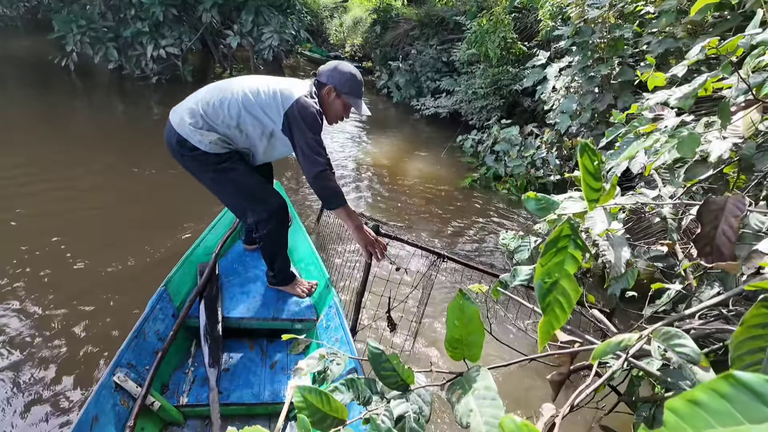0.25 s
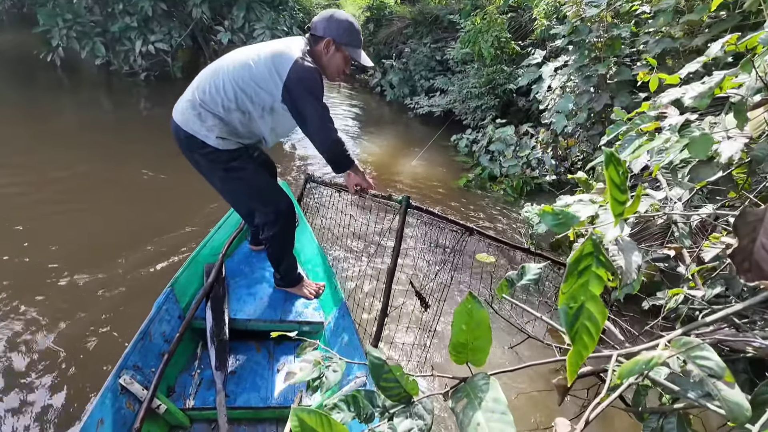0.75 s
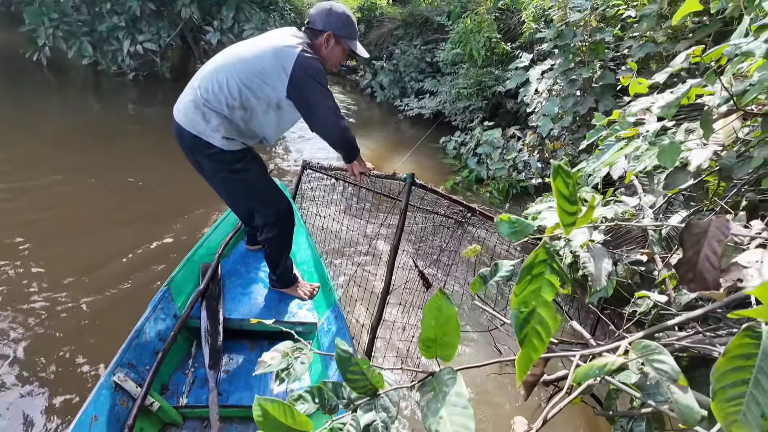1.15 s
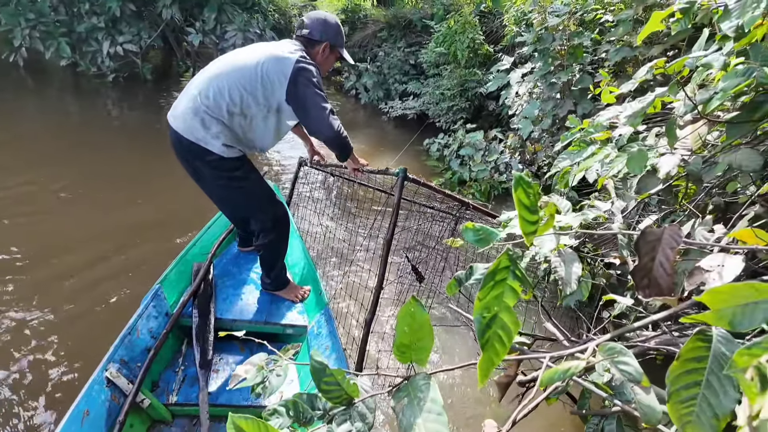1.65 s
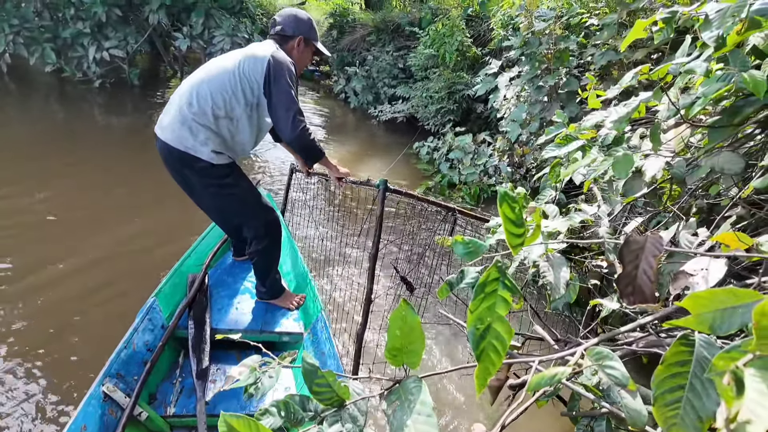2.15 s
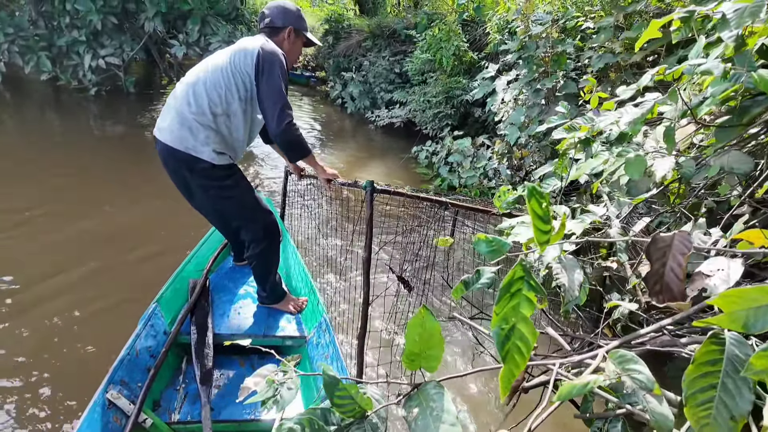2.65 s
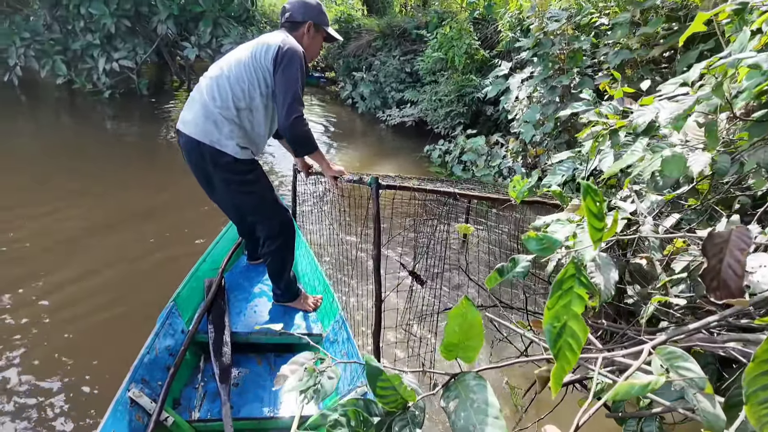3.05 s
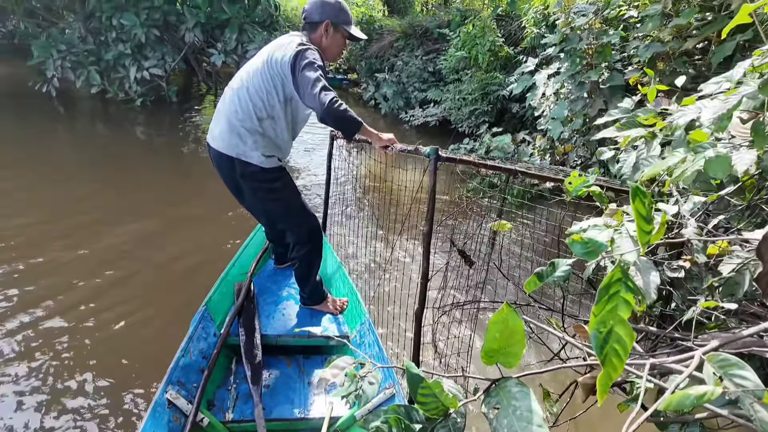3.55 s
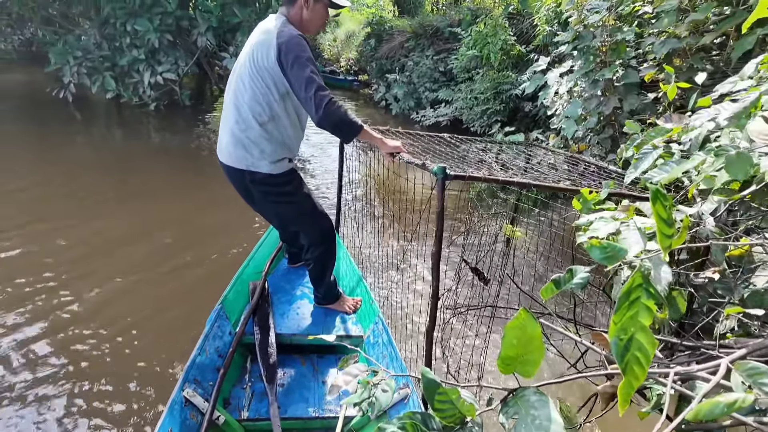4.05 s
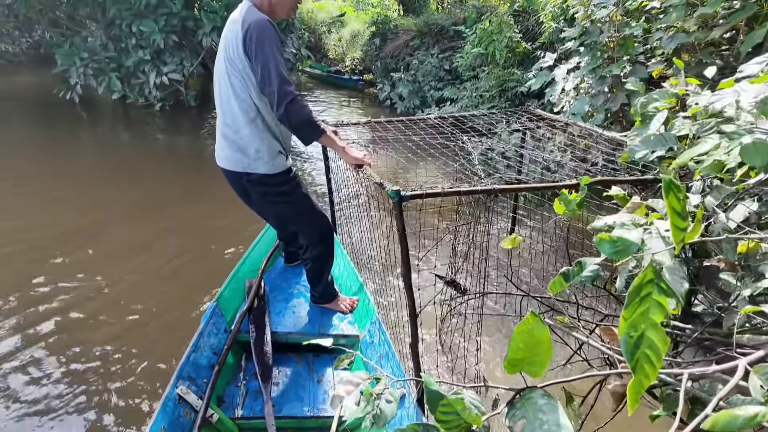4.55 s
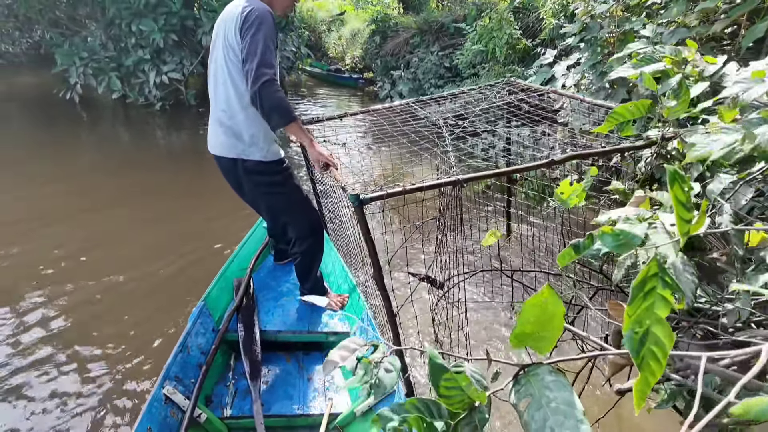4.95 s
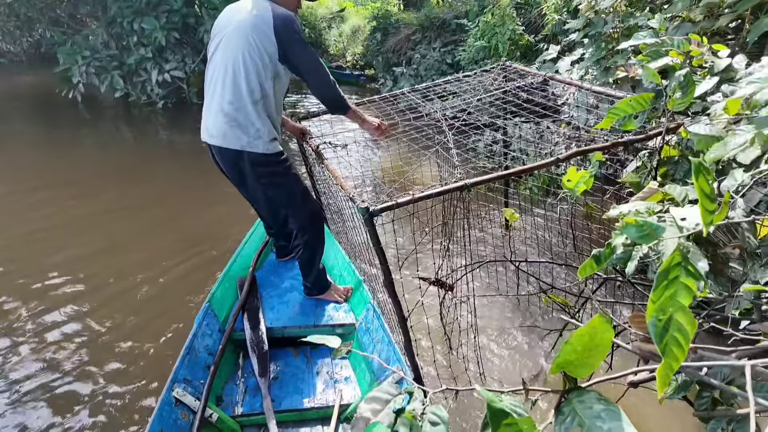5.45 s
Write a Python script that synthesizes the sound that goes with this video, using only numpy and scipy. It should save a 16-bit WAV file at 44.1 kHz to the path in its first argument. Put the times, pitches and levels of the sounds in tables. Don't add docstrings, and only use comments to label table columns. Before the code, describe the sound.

A metal-framed mesh fish trap scrapes and knocks hollowly against a wooden boat, wires ticking and wet mesh rustling through leaves while cicadas buzz.

```python
import sys
import numpy as np
from scipy import signal
from scipy.fft import rfft, irfft
from scipy.io import wavfile
from scipy.ndimage import uniform_filter1d, minimum_filter1d

SR = 44100
rng = np.random.default_rng(int(sys.argv[2]) if len(sys.argv) > 2 else 0)


def inscribe(sig):
    pcm = np.round(np.clip(np.atleast_2d(sig).T, -1, 1) * 32767)
    wavfile.write(sys.argv[1], SR, pcm.astype(np.int16))


def boost_factor(decibels):
    exponent = np.asarray(decibels, float) / 20
    return 10 ** exponent


N = 251370


def evened(x):
    return x / np.sqrt(np.mean(x ** 2) + 1e-20)


def peaked(x):
    return x / abs(x).max()


def read(points, hz):
    f, value = np.transpose(points)
    return np.interp(np.log(hz + 1), np.log(f + 1), value)


def curve(table, column):
    rows = np.array(table)
    return boost_factor(np.interp(np.arange(N) / SR, rows[:, 0], rows[:, column]))


def swells(s, db, rise_s, fall_s):
    hop = 64
    t = np.arange(0, N + hop, hop)[:, None] / SR - np.array(s)
    below_db = 20 * np.where(t < 0, -t / rise_s, t / fall_s)
    power = boost_factor(np.array(db) - below_db) ** 2
    return np.interp(np.arange(N), np.arange(len(t)) * hop, np.sqrt(power.sum(1)))


def add(mix, s, sound):
    part = mix[..., round(s * SR):][..., :sound.shape[-1]]
    part += sound[..., :part.shape[-1]]


def ring(modes, seconds):
    t = np.arange(round(seconds * SR)) / SR
    return sum(boost_factor(db - 60 * t / t60) * np.sin(2 * np.pi * hz * t) for hz, db, t60 in modes)


def clicks(per_s, spread_db, channels):
    out = np.zeros((channels, N))
    count = round(per_s * N / SR)
    place, sign, size = rng.random((channels, count, 3)).T
    size_db = spread_db * np.minimum(-np.log(size + 1e-9), 4)
    heights = np.sign(sign - .5) * boost_factor(size_db)
    np.put_along_axis(out, (place.T * N).astype(int), heights.T, axis=1)
    return out


def smooth_noise(shape, bins, frames):
    across = uniform_filter1d(rng.standard_normal(shape), bins, axis=0)
    return evened(uniform_filter1d(across, frames, axis=1))


# (frequency [Hz], likeness [0-1])
LIKENESS = [(60, 1), (180, 0.92), (550, 0), (1650, 0.49), (4970, -0.0), (15000, 0.01)]


def coloured(x, spectrum, patchy_db):
    hz, t, z = signal.stft(x, SR, nperseg=512)
    patches = smooth_noise(z.shape[1:], bins=6, frames=8)
    same = np.clip(read(LIKENESS, hz), 0, 1)[:, None] ** 2
    mid = z[0] * np.sqrt(1 + same)
    side = z[1] * np.sqrt(1 - same)
    z = np.array([mid + side, mid - side]) * boost_factor(read(spectrum, hz)[:, None] + patchy_db * patches)
    return evened(signal.istft(z, SR, nperseg=512)[1][:, :N])


# (time [s], depth [dB])
DUCKS = [
    (.17, 2),
    (.48, 6),
    (1.01, 9.5),
    (3.385, 6),
    (3.715, 15),
    (4.175, 16.5),
]
RECOVER_DB_PER_S, DUCK_S = 7, 0.022


def ducking():
    ducks = np.array(DUCKS)
    since_s = np.arange(N) / SR - ducks[:, :1]
    depth_db = np.where(since_s > 0, ducks[:, 1:] - RECOVER_DB_PER_S * since_s, 0).max(0)
    return boost_factor(-uniform_filter1d(np.maximum(depth_db, 0), size=round(DUCK_S * SR)))


def slips_into(modes, per_s, spread_db, detune, uneven_db, spot_db, wide, count):
    spot_s, damped = .08, 0.85
    out = np.zeros((2, N))
    for tuning, balance in rng.uniform(-1, 1, (count, 2, len(modes))):
        visits = np.interp(np.arange(N) / SR / spot_s, np.arange(200), rng.uniform(-1, 1, 200))
        slips = clicks(per_s / count, spread_db, channels=2) * boost_factor(spot_db * visits)
        spread = slips[0] + wide * slips[1] * [[1], [-1]]
        tuned = [(hz * (1 + detune * a), db + uneven_db * b, t60 * damped)
                 for (hz, db, t60), a, b in zip(modes, tuning, balance)]
        out += signal.oaconvolve(spread, ring(tuned, 0.13)[None], axes=1)[:, :N]
    return evened(out)


# (time [s], pressure [dB], scrape over boom [dB])
DRAG = [(0.0, -28, -11), (0.11, -26.5, -7.5), (0.3, -26.5, 0), (0.62, -30.5, 5.5), (0.7, -29.5, 2),
        (0.83, -24.5, 1.5), (1.16, -32, -5.5), (1.46, -29, 1), (1.73, -37, -13), (1.9, -60.5, -2),
        (2.35, -43.5, -9.5), (2.81, -50, 18.5), (3.1, -48, 2.5), (3.33, -23, 0.5), (3.7, -23, 0.3),
        (3.76, -24, -12.5), (3.86, -46.5, -1), (5.7, -53.5, -0.5)]
# (time [s], boom [dB], scrape [dB], length [s])
RUBS = [
    (2.16, -47, -36, 0.24),
    (4.098, -43, -46, 0.11),
    (4.845, -61, -39.5, 0.22),
    (5.097, -50, -39, 0.16),
    (5.26, -35.5, -36.5, 0.43),
    (5.434, -43, -45, 0.094),
]
# (frequency [Hz], level [dB], t60 [s])
PANELS = [(130, -48, 0.047), (148, 4.5, 0.28), (170, -2.5, 0.074), (191.4, -6.5, 0.15), (236.7, -2, 0.15),
          (285, -17.5, 0.068), (398, -20, 0.19)]
# (frequency [Hz], level [dB], t60 [s])
GUNWALE = [(377, -1, .06), (505, 0, .06), (570, 2, .06), (700, 4, .05), (884, 6, .06), (1068, 7, .05),
           (1310, 6, .04), (1500, 5, .035), (1860, 4, .03), (2190, 3, .025), (2900, -1, .025)]
SHUDDER_BOOM_DB, SHUDDER_SCRAPE_DB, SHUDDER_S = -16.5, -18, 0.12
DRAG_TOP_DB = -19


def drag():
    boom = slips_into(PANELS, 400, 3.6, detune=0.049, uneven_db=1.0, spot_db=11, wide=0.05, count=3)
    scrape = slips_into(GUNWALE, 3200, 3.2, detune=0.07, uneven_db=6, spot_db=6, wide=0.28, count=8)
    s, crack_db, over_db = np.transpose(KNOCKS)[:3]
    rub_s, boom_db, scrape_db, length_s = np.transpose(RUBS)
    press = curve(DRAG, column=1)
    low = press + swells(s, crack_db + over_db + SHUDDER_BOOM_DB, 0.017, SHUDDER_S)
    low += swells(rub_s, boom_db, length_s, length_s)
    high = press * curve(DRAG, column=2)
    high += swells(s, crack_db + SHUDDER_SCRAPE_DB, 0.013, 0.66 * SHUDDER_S)
    high += swells(rub_s, scrape_db, length_s, length_s)
    return boom * np.minimum(low, boost_factor(DRAG_TOP_DB)) + scrape * high * boost_factor(-4)


# (time [s], level [dB], length [s])
HEAVES = [(0.0, -14, 0.12), (.27, -20, 0.11), (.76, -24, .15), (1.007, -45, .1), (1.246, -17, .1),
          (1.84, -20.5, 0.13), (2.3, -29, 0.19), (2.55, -36, 0.1), (2.96, -17.5, 0.3), (3.26, -16, .1),
          (3.7, -36, 0.11), (4.105, -34, 0.2), (4.52, -35, .2), (4.9, -34, 0.5), (5.455, -31, 0.75)]
STILL_DB = -43


def heaving_water():
    band = signal.butter(2, [52, 80], "bandpass", fs=SR, output="sos")
    rumble = evened(signal.sosfilt(band, rng.standard_normal(N)))
    s, db, length_s = np.transpose(HEAVES)
    level = swells(s, db, length_s, length_s) + boost_factor(STILL_DB) * ducking()
    return rumble * level * boost_factor(-10.5)


# (frequency [Hz], width [Hz], level [dB])
SONG = [(5740, 200, -20.5), (7533, 400, -7), (7828, 890, 2), (14960, 640, -25), (15030, 760, -10.5)]
# (frequency [Hz], density [dB per Hz])
AIR = [(40, -12), (70, 7), (150, 10.5), (300, -39), (1000, -32), (2500, -33), (4500, -14), (6500, -10),
       (9500, -17.5), (12500, -14), (14000, -17), (16000, -41)]
SINGERS_DB = -29


def cicadas():
    pulses = evened(clicks(1400, 2.5, channels=2)) + .5 * rng.standard_normal((2, N))
    body = ring([(hz, db + 20 * np.log10(width / 500) / 2, 2.2 / width) for hz, width, db in SONG], .02)
    soft = body * np.minimum(np.arange(len(body)) / 47.0, 1)
    song = evened(signal.oaconvolve(pulses, soft[None], axes=1)[:, :N])
    wash = coloured(rng.standard_normal((2, N)), AIR, patchy_db=2.5)
    both = song * boost_factor(1.5) + wash * boost_factor(-6.0)
    return both * boost_factor(SINGERS_DB) * ducking() * boost_factor([[-.6], [.6]])


# (time [s], level [dB], rise [s], fall [s])
PULLS = [(.27, -32.5, 0.065, .06), (.4, -27, 0.14, 0.12), (.59, -28, 0.19, 0.19), (.78, -35, 0.057, 0.1),
         (.97, -37.5, 0.056, 0.07), (1.25, -35, .06, .07), (1.35, -37.5, 0.1, 0.11),
         (2.615, -30, 0.008, 0.14), (2.76, -31.5, 0.19, 0.072), (2.84, -26.5, 0.05, 0.1),
         (3.25, -26, 0.23, 0.27), (3.38, -29, 0.034, 0.022), (3.6, -33.5, 0.32, 0.23),
         (3.71, -31.5, 0.044, 0.025), (4.19, -44.5, 0.084, 0.41), (4.35, -42.5, 0.03, 0.25),
         (4.58, -34.5, 0.037, 0.75), (4.79, -32, 0.063, 0.18), (4.971, -30.5, 0.15, 0.43),
         (5.088, -17, 0.003, 0.03), (5.1, -27, 0.02, 0.13), (5.195, -23, .005, 0.006),
         (5.2, -35.5, 0.081, 0.93), (5.4, -34, 0.13, 0.17)]
# (time [s], level [dB])
RUNOFF = [
    (0.0, -40.5),
    (1.0, -36),
    (1.68, -47.5),
    (2.59, -43.5),
    (3.7, -35.5),
    (4.5, -40.5),
    (5.7, -33.5),
]
# (frequency [Hz], density [dB per Hz])
RUSTLE = [(300, -16.5), (600, -10), (1000, -9.5), (1600, -4), (3000, -2.5), (6300, -8.5), (7500, -11.5),
          (9000, -8.5), (12500, -11), (16000, -10.5)]


def rustle():
    grains = evened(clicks(4500, 2.24, channels=2)) + .5 * rng.standard_normal((2, N))
    crackle = coloured(grains, RUSTLE, patchy_db=1.2)
    level = np.hypot(swells(*np.transpose(PULLS)), curve(RUNOFF, column=1) * ducking())
    return crackle * level * boost_factor(4.5) * boost_factor([[-.6], [.6]])


# (time [s], crack [dB], boom over crack [dB], small panels over large [dB], boom [Hz])
KNOCKS = [(.159, -8, 6, 3.5, 148), (0.222, -21.5, 10, -4, 143.5), (0.423, -23, 13.5, 10.5, 129),
          (0.449, -16.5, 5, -18, 154), (0.462, -14, 2, -13, 156), (.472, -7.5, 1.5, 21, 131),
          (0.481, -18, 10.5, -26, 148), (0.498, -23, 14.5, 8, 148), (0.56, -14.5, 7, 10.5, 163.4),
          (.581, -17, 12, 3, 143), (0.942, -23.5, 12.5, -12, 130), (0.994, -8.5, 9, 2.5, 137),
          (1.218, -18, 2, -11, 124), (1.375, -26.5, 9, 10, 127), (1.437, -27, 11, -10, 147),
          (3.202, -38, 20, -25, 127), (3.375, -3, -1, 7.5, 156.5), (3.433, -33, 2, 4, 160),
          (3.484, -17, 13.5, 27, 166), (3.53, -21, 4.5, -8, 170), (3.588, -12.5, 3, 9, 122),
          (3.663, -20, 3, 0, 128), (3.705, -8, 4.5, 0, 148), (4.206, -34, 3, 8, 160)]
# (frequency [Hz], level [dB], t60 [s])
PLANKS = [(375, -5.5, 0.042), (541, 5.5, 0.11), (670.7, -2, 0.16), (931, 3.5, 0.13), (1070, 4, 0.05),
          (1266, 9, 0.047), (1539, 11, 0.041), (1800, -0.5, 0.027), (2200, 5, 0.028), (2700, -3.5, 0.041),
          (3500, 0.5, 0.029)]
CRACK_TOP_HZ, CRACK_FLOOR_HZ, DB_PER_OCTAVE = 1600., 650., 21


def knocks():
    size = 8192
    out = np.zeros(N)
    hz = np.fft.rfftfreq(size, 1 / SR)
    rest = boost_factor(-8.0 / (1 + np.exp((.058 - np.arange(size) / SR) / 0.0043)))
    travel = np.exp(-4j * np.pi * .16 * (np.sqrt(hz) - hz / (2 * np.sqrt(6000.))))
    front = hz ** 2 / (117.0 ** 2 + hz ** 2) / (hz + 100) ** 0.61
    for s, db, boom_db, small_db, boom_hz in KNOCKS:
        tuning, balance = rng.uniform(-1, 1, (2, len(PLANKS)))
        crack_hz = max(CRACK_TOP_HZ * 2 ** (db / DB_PER_OCTAVE), CRACK_FLOOR_HZ)
        planks = [(f * (1 + .05 * a), d + 3.0 * b - 3.0 * abs(np.log2(f / crack_hz)), t60)
                  for (f, d, t60), a, b in zip(PLANKS, tuning, balance)]
        panels = [(f, d + small_db, t60) if f > 200 else (f * boom_hz / 145.1, d, t60)
                  for f, d, t60 in PANELS]
        path = travel / (1 + (hz / (1.5 * crack_hz)) ** 6)
        late_s = .014 * rng.random((6, 1))
        sign = rng.choice([-1., 1.], (6, 1))
        echoes = .75 * sign * boost_factor(-600 * late_s) * np.exp(-2j * np.pi * hz * late_s)
        ribs = 1 + echoes.sum(0)
        crack = peaked(irfft(rfft(ring(planks, 0.13), size) * path))
        crack = crack + boost_factor(4.5) * peaked(irfft(front * path * ribs))
        boom = peaked(irfft(rfft(ring(panels, 0.26), size) * path)) * rest
        add(out, s, boost_factor(db) * (peaked(crack) + boost_factor(boom_db) * boom)[:7600])
    return out


# (time [s], level [dB], pitch [Hz])
BENCHES = [(.164, -9.5, 237.5), (.166, -17, 424), (0.182, -6.5, 141), (3.716, -5.5, 148), (.173, -10, 514),
           (0.4722, -2.5, 1440), (0.999, -11, 388), (1.002, -18, 295), (3.378, -9, 853), (3.384, -13, 650),
           (3.707, -3, 2250), (3.706, 0, 1042), (3.711, -5.5, 580), (3.377, -11, 1600), (3.483, -20, 1500),
           (3.486, -18, 877), (1.437, -18, 450), (1.438, -24, 900), (1.221, -21, 1020), (.3688, -12, 1600),
           (2.752, -26, 2500), (2.8258, -13, 1650), (2.8433, -12, 1300), (2.846, -16, 800),
           (2.6098, -23, 4430), (2.6105, -27, 1800), (2.8262, -20, 3100), (2.331, -27, 1030),
           (2.194, -31, 2550), (.3518, -17, 1760), (.4511, -15, 1310), (.5578, -19, 1290),
           (.996, -15, 1300), (1.2158, -24, 1600), (3.4842, -21, 2150), (3.2033, -23, 3170),
           (2.6931, -27, 1990)]
BENCH_CYCLES, BENCH_RISE_S, BENCH_LONGEST_S = 37, 0.0013, .13


def benches():
    out, t = np.zeros(N), np.arange(6000) / SR
    for s, db, hz in BENCHES:
        t60 = min(BENCH_CYCLES / hz, BENCH_LONGEST_S)
        pair = ring([(hz, db, t60), (hz * 1.2, db - 9.5, t60)], len(t) / SR)
        add(out, s, pair * np.minimum(t / BENCH_RISE_S, 1))
    return out


# (time [s], level [dB], pitch [Hz], spray over it [dB])
WIRES = [(0.257, -11.5, 1500, -27), (0.353, -7, 1780, -13), (0.369, -12, 1690, -21),
         (0.387, -13, 1540, -33), (0.408, -12.5, 1430, -17), (0.523, -19, 2980, -11),
         (0.546, -28, 630, -16), (0.588, -18, 746, -18), (0.719, -31, 1070, -15), (0.766, -18.5, 630, -21),
         (0.848, -23, 1000, -25), (0.955, -17, 1800, -19), (1.054, -30, 1040, -13),
         (1.104, -22.5, 970, -13), (1.25, -23, 1090, -22), (1.34, -25, 2240, -21), (1.464, -22, 1600, -5),
         (2.695, -13.5, 970, -15), (2.707, -14, 1230, -5), (2.73, -16, 950, -19), (2.768, -16.5, 935, -11),
         (2.821, -13, 2900, -13), (2.844, -11, 1000, -20), (2.881, -23, 805, -6), (3.339, -11, 645, -18)]
# (time [s], level [dB], pitch [Hz])
PINGS = [(0.2625, -10.5, 3700), (0.3878, -10, 2600), (0.4204, -12.5, 2550), (0.5804, -12.5, 4530),
         (1.2509, -15, 2560), (1.3405, -19, 2170), (2.331, -20, 1600), (2.3304, -17, 3500),
         (4.566, -39, 3690), (5.0861, -13, 2770), (5.1921, -16, 3180)]
# (time [s], level [dB], pitch [Hz], leaf hiss over it [dB])
TWIGS = [(0.418, -19, 953, 16), (1.208, -17, 1700, 4), (1.888, -32.5, 2700, -3), (2.118, -34, 1130, -2),
         (2.194, -26, 1600, -3), (2.331, -20.5, 1800, 8), (2.4, -28, 2050, -5), (2.569, -28, 1310, -4),
         (2.61, -17, 4270, 6), (3.109, -18, 2600, 14), (3.252, -13.5, 2520, -5), (3.29, -16.5, 1550, 2),
         (4.336, -38, 2200, 20), (4.384, -33, 3040, -18), (4.799, -27.5, 1400, -14),
         (4.956, -20, 3780, -13), (4.979, -19, 3360, -12), (5.086, -12, 3980, 2), (5.344, -24, 2310, 2),
         (5.419, -19.5, 2350, 7), (5.525, -22, 1310, -9)]
WIRE_PAN_DB, TWIG_PAN_DB, PING_PAN_DB, PING_SPRAY_DB = -0.5, -1.5, 1, -26
WIRE_RATTLE_S, TWIG_RATTLE_S, PING_RATTLE_S = 0.091, 0.089, 0.055


def ticks():
    out, t = np.zeros((2, N)), np.arange(4000) / SR
    rows = [(*row, WIRE_PAN_DB, WIRE_RATTLE_S) for row in WIRES]
    rows += [(*row, TWIG_PAN_DB, TWIG_RATTLE_S) for row in TWIGS]
    rows += [(*row, PING_SPRAY_DB, PING_PAN_DB, PING_RATTLE_S) for row in PINGS]
    for s, db, hz, bright_db, pan_db, rattle_s in rows:
        dying = boost_factor(-60 * t / rattle_s)
        slips = .55 * rng.standard_normal(len(t)) * (rng.random(len(t)) < 1200 / SR) * dying
        slips[:3] = [.2, .4, .2]
        modes = [(hz, 0, min(.014, 30 / hz)), (hz * 0.76, -5, .015), (hz * 1.463, -7, .012),
                 (hz * 2.1, -9, .01), (hz * 0.525, -8, .018)]
        wire = signal.fftconvolve(slips, ring(modes, .04))[:len(t)]
        hiss = np.diff(rng.standard_normal((2, len(t) + 1)))
        hiss = hiss * (boost_factor(-60 * t / 0.0089) + boost_factor(-5.5) * dying)
        pan = boost_factor(db + np.array([[pan_db / 2], [-pan_db / 2]]))
        add(out, s, pan * (peaked(wire) + boost_factor(bright_db - 22.0) * hiss))
    return out


# (time [s], level [dB], pitch [Hz])
NUDGES = [(.75, -20, 143), (.8, -22, 235), (.877, -18, 135), (1.07, -22, 150), (1.125, -24, 230),
          (1.277, -22, 135), (1.381, -17, 200), (1.458, -13, 148), (1.52, -21, 150), (1.559, -19, 178),
          (1.597, -21, 140), (1.645, -20, 190), (1.716, -19, 190), (1.828, -29, 120), (3.395, -12, 150),
          (3.607, -14, 150), (3.68, -15, 140), (4.8, -37, 110), (5.165, -32, 170), (5.42, -34, 200),
          (.31, -19, 150), (2.2, -35, 150), (2.35, -36, 140)]
NUDGE_RISE_CYCLES, NUDGE_RING_CYCLES = 1.5, 14


def nudges():
    out, t = np.zeros(N), np.arange(8000) / SR
    for s, db, hz in NUDGES:
        swell = 1 - np.exp(-(t * hz / NUDGE_RISE_CYCLES) ** 2)
        panel = ring([(hz, 0, NUDGE_RING_CYCLES / hz), (hz * 1.58, -8, 9.0 / hz)], len(t) / SR)
        add(out, s, peaked(swell * panel) * boost_factor(db))
    return out


# (middle [s], level [dB], pitch [Hz], length [s])
SQUEAKS = [(.415, -28, 1500, .03), (.455, -24, 1100, .03), (.665, -28, 650, .04), (.665, -31, 1300, .03),
           (.735, -32, 1050, .04), (.79, -30, 600, .06), (.79, -32, 1000, .06), (.865, -32, 950, .05),
           (.965, -27, 550, .04), (.97, -28, 1000, .03), (1.26, -34, 1000, .03), (1.47, -34, 550, .06),
           (2.07, -45, 980, .04), (2.07, -47, 1950, .04), (2.125, -41, 1130, .04), (2.15, -43, 1000, .04),
           (2.18, -44, 1500, .05), (2.2, -42, 950, .04), (2.235, -45, 980, .05), (2.355, -44, 1550, .05),
           (2.415, -44, 2000, .05), (2.74, -35, 500, .04), (2.775, -36, 800, .03), (2.865, -33, 620, .03),
           (3.29, -32, 1550, .03), (3.33, -28, 2250, .06), (3.34, -26, 1520, .05), (3.35, -25, 630, .04),
           (3.32, -26, 400, .08), (3.73, -22, 380, .04), (3.74, -27, 800, .05), (3.39, -26, 377, .04),
           (3.4, -26, 650, .03), (3.47, -29, 650, .04), (3.57, -21, 883, .12), (3.6, -22, 377, .07),
           (3.6, -29, 1060, .08), (3.665, -24, 1050, .05), (.63, -30, 1050, .05), (.59, -30, 1800, .04),
           (1.1, -35, 1600, .06), (1.5, -38, 1000, .06), (2.15, -47, 500, .1), (3.52, -30, 2200, .06),
           (3.63, -29, 1590, .03), (4.22, -45, 540, .04), (5.01, -45, 540, .04)]
SQUEAK_RING_S, SQUEAK_SLIPS_PER_S = .07, 2500


def squeaks():
    out, t = np.zeros(N), np.arange(5000) / SR
    for s, db, hz, length_s in SQUEAKS:
        force, chance = rng.random((2, len(t)))
        rub = np.sin(np.pi * np.minimum(t / length_s, 1))
        slips = (force - .5) * (chance < SQUEAK_SLIPS_PER_S / SR) * rub
        modes = [(hz, 0, SQUEAK_RING_S), (hz * 1.04, -8, .6 * SQUEAK_RING_S)]
        bar = signal.fftconvolve(slips, ring(modes, .07))
        add(out, s - length_s / 2, peaked(bar) * boost_factor(db + 5.5))
    return out


# (time [s], level [dB], pitch [Hz])
SNAP = [
    (4.1683, -11, 9300),
    (4.1694, -2, 9400),
]


def twig_snap():
    out, t = np.zeros((2, N)), np.arange(4000) / SR
    for s, db, hz in SNAP:
        tail = np.diff(rng.standard_normal((2, len(t) + 1))) * boost_factor(-21 - 60 * t / 0.06)
        modes = [(hz, 0, .004), (hz * 1.1, -5, .003), (hz * 0.94, -9, .003),
                 (hz * 1.3, -5, .003), (hz * .68, -10, .004)]
        crack = ring(modes, len(t) / SR) * np.minimum(t / .0003, 1)
        add(out, s, boost_factor(db) * (crack * boost_factor([[-4], [2.5]]) + tail))
    return out


def bank(x):
    t = np.arange(6000) / SR
    sign = rng.choice([-1., 1.], (2, len(t)))
    hits = rng.random((2, len(t))) < 1500 / SR
    taps = sign * hits * boost_factor(-60 * t / .1) * (t > .003)
    return signal.oaconvolve(x, taps / np.linalg.norm(taps[0]), axes=1)[:, :N]


def late(x, samples):
    return np.array([np.roll(x[0], samples), x[1]])


def scene():
    highpass = signal.butter(2, 480., "highpass", fs=SR, output="sos")
    snaps = signal.sosfilt(highpass, ticks() + twig_snap())
    blows = knocks() + benches() + nudges()
    hull = blows + drag() + heaving_water()
    around = boost_factor(-5) * bank(snaps + boost_factor(-10.5) * blows) + rustle() + cicadas()
    return late(hull + squeaks(), samples=1) + late(snaps, samples=4) + around


# (frequency [Hz], depth [dB])
MASK = [(2600, 33.5), (4500, 22), (6500, 28), (9000, 42), (11500, 19.5), (13800, 14.5), (14500, 36)]
TREBLE_HZ = 2600


def thinned(x, unsure_db):
    hz, t, z = signal.stft(x, SR, nperseg=1024)
    power = uniform_filter1d((abs(z) ** 2).mean(0), size=7, axis=0)
    band_db = 10 * np.log10(power + 1e-14)
    top_db = uniform_filter1d(band_db[hz > TREBLE_HZ].max(0), size=9)
    unsure = smooth_noise(band_db.shape, bins=7, frames=3)
    keep = np.clip(band_db - top_db + read(MASK, hz)[:, None] + unsure_db * unsure, .02, 1)
    keep[hz < TREBLE_HZ] = 1
    return signal.istft(z * keep, SR, nperseg=1024)[1][:, :N]


def band_limit(x):
    return signal.sosfilt(signal.butter(12, 16830, fs=SR, output="sos"), x)


def record(dry):
    heard = signal.sosfilt(signal.butter(4, 68., "highpass", fs=SR, output="sos"), dry)
    peak = -minimum_filter1d(-abs(heard).max(0), size=441)
    held = heard / np.maximum(uniform_filter1d(peak, size=441) / .97, 1)
    lowpass = signal.firwin(511, 15720, window=("kaiser", 9), fs=SR)
    cut = signal.oaconvolve(held, lowpass[None], "same")
    return band_limit(thinned(cut, unsure_db=7.0))


dry = scene()
out = record(dry)
inscribe(out)
```